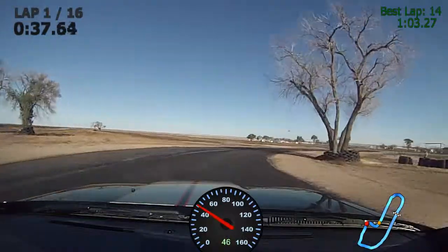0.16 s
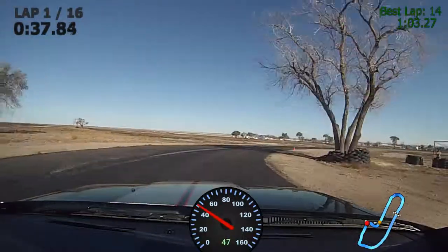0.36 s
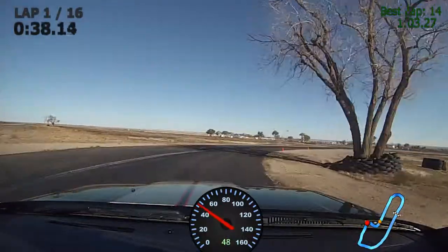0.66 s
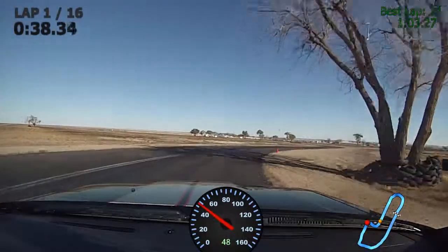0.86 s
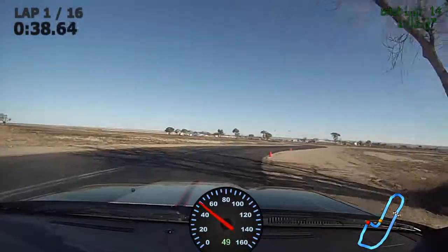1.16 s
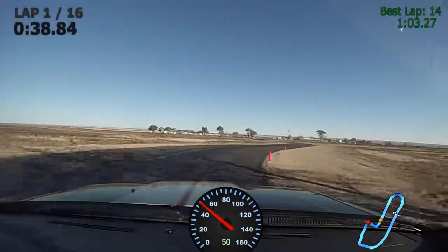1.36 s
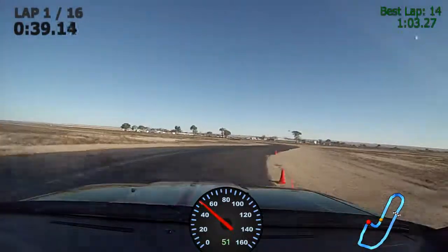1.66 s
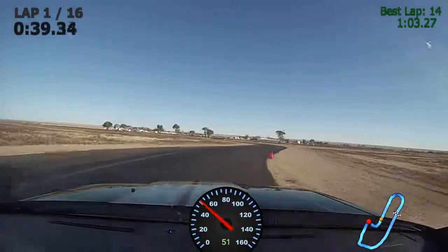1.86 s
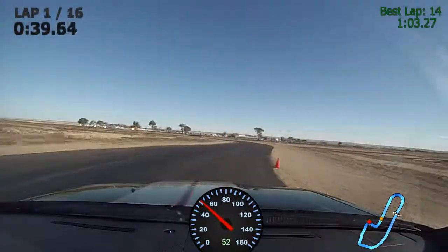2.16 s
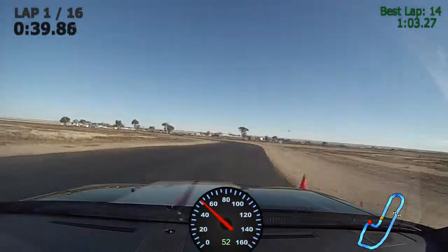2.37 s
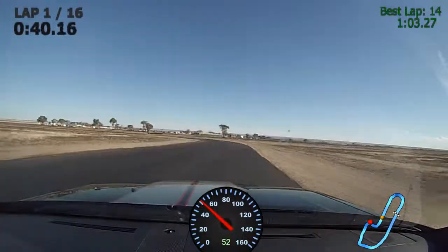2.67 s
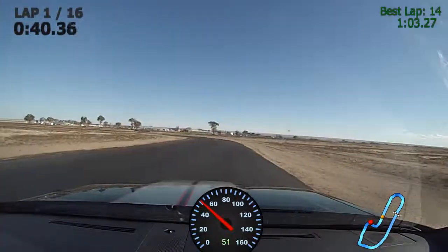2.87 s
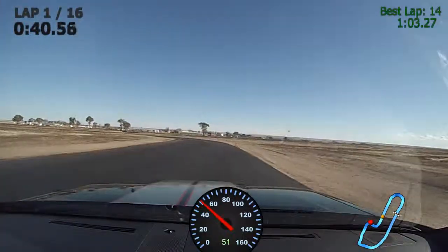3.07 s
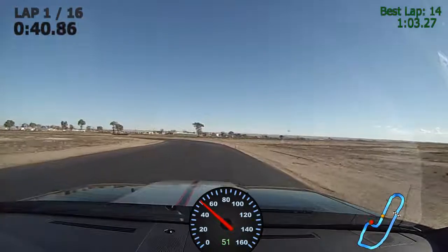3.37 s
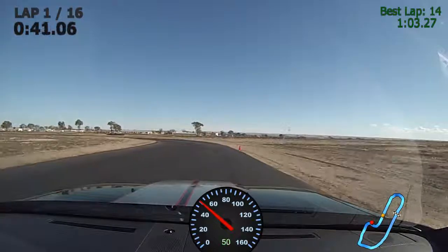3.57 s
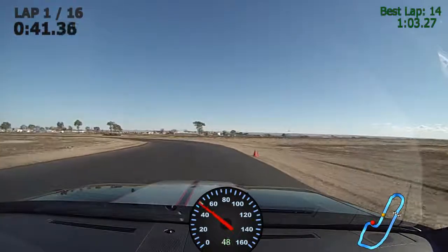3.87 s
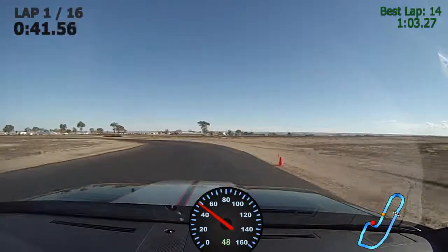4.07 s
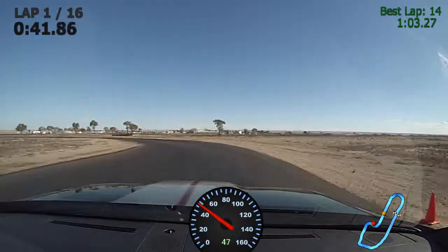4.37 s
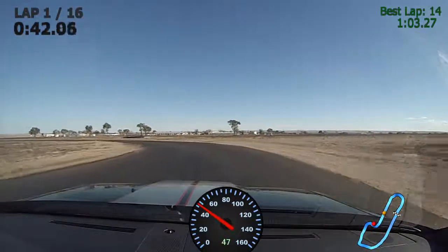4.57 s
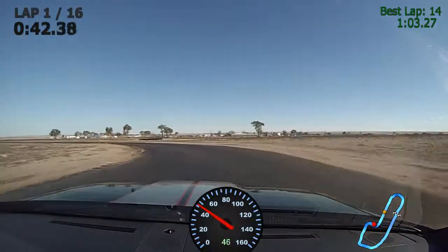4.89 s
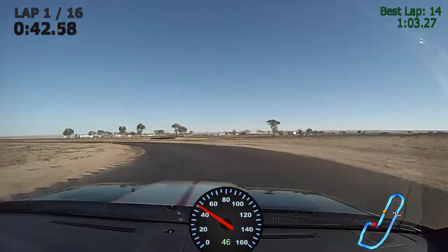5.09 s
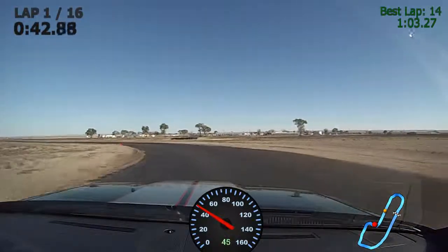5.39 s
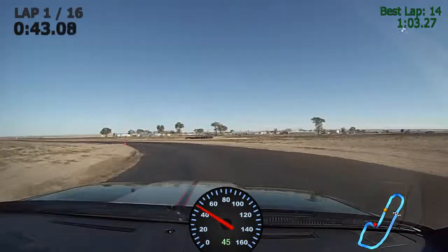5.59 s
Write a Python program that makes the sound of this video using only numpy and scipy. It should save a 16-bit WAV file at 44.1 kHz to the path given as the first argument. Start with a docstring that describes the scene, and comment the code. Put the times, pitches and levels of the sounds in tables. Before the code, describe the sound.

Inside a V8 track car, the engine pulls hard, tyres howl and squeal through a bend, then throttle lifts to a low growl.

```python
"""Inside a V8 track car in a long bend. The engine pulls from 3000 to 3500 rpm; a bump thumps the camera at 1.3 s.
The tyres howl and squeal from 1.6 to 2.5 s; at 3 s the engine lifts, shifts up and growls on at 2400 rpm.
At 5.3 s loose things clack and the tyres squeal again; a second bump follows. Wind and road noise run throughout.
Engine: sine orders plus pulse-excited pipe noise. Tyres, wind, road: shaped noise, squeals are tones.
Blows: damped modes and noise bursts. The camera's gain control ducks on peaks."""
import sys
import numpy as np
from scipy.fft import rfft, irfft, next_fast_len
from scipy.io import wavfile
from scipy.ndimage import uniform_filter1d, minimum_filter1d, map_coordinates

SR = 44100
rng = np.random.default_rng(int(sys.argv[2]) if len(sys.argv) > 2 else 0)


def generate_wav(sig):
    """Save sig (samples, or channels by samples) to the path in sys.argv[1] as 16-bit PCM at SR."""
    pcm = np.round(np.clip(np.atleast_2d(sig).T, -1, 1) * 32767).astype(np.int16)
    wavfile.write(sys.argv[1], SR, pcm)


N = 253134
T = np.arange(N) / SR
# the pipe booms less above this crank speed
BOOM_HZ = 50


def amp(db):
    """Decibels to gain."""
    return 10 ** (np.asarray(db) / 20)


def unit(x):
    """Scale to rms 1."""
    return x / np.sqrt(np.mean(x ** 2) + 1e-20)


def along(points, hz):
    """(Hz, value) points read on a log frequency axis."""
    f, v = np.transpose(points)
    return np.interp(np.log(hz + 1), np.log(f), v)


def curves(rows):
    """One value per sample for each column after the time."""
    s, *cols = np.transpose(rows)
    return [np.interp(T, s, c) for c in cols]


def wobble(rate_hz):
    """Smooth random curve, rate_hz knots a second."""
    return map_coordinates(rng.standard_normal(4096), [T * rate_hz], mode="mirror")


def swell(start_s, length_s):
    """Rounded burst envelope."""
    phase = np.clip((T - start_s) / length_s, 0, 1)
    return np.sqrt(np.abs(np.sin(np.pi * phase)))


def filtered(x, response):
    """x times a response of frequency."""
    m = next_fast_len(N + 8192)
    return irfft(rfft(x, m) * response(np.fft.rfftfreq(m, 1 / SR)), m)[:N]


def coloured(x, spectrum):
    """x shaped by a spectrum, at rms 1."""
    return unit(filtered(x, lambda hz: amp(along(spectrum, hz))))


def noise(spectrum):
    """Coloured noise of rms 1."""
    return coloured(rng.standard_normal(N), spectrum)


def order_tone(order, turns):
    """Sine of rms 1 locked to the crank, random phase."""
    return np.sqrt(2) * np.sin(2 * np.pi * (order * turns + rng.random()))


def engine(crank_hz, turns, shut):
    """Two low orders drone; unequal cylinders add half orders that sweep through the cabin's resonances."""
    # cabin response to the upper orders: f/Hz, level/dB
    cabin = [(50, -9), (80, 6), (115, 3), (170, 4.5), (200, 7), (265, -11.5), (322, -3), (335, -3.5),
             (349, 3), (392, -12), (422, 0.5), (465, -7), (503, 0.5), (530, -4.5), (570, -3), (660, -14.5),
             (820, -16.5), (1200, -34)]
    # single orders boom in the cabin, back on throttle at low revs: t/s, length/s, order, level/dB
    booms = [(4.205, 0.39, 4, -22), (4.628, 0.15, 3, -20.5)]
    # level at full throttle, drop with the throttle shut
    third_full_db, third_shut_db = -23, 15.5
    firing_full_db, firing_shut_db, firing_db_per_hz = -21, 22, 0.45
    upper_full_db, upper_shut_db = -33, 13
    # upper orders relative to the even ones
    odd_db, half_db = -2.5, -6.5

    third_db = third_full_db - third_shut_db * shut
    rev_loss_db = firing_db_per_hz * np.maximum(0, crank_hz - BOOM_HZ)
    firing_db = firing_full_db - firing_shut_db * shut - rev_loss_db
    upper_db = upper_full_db - upper_shut_db * shut

    out = np.zeros(N)
    for k, level_db in ((3, third_db), (4, firing_db)):
        boom = sum(amp(db) * swell(s, length) for s, length, order, db in booms if round(order) == k)
        level = np.maximum(amp(level_db), boom)
        out += level * amp(.9 * wobble(15)) * order_tone(k, turns)
    # orders 1.5 to 17 in halves
    for k in np.setdiff1d(np.arange(3, 35) / 2, [3, 4]):
        weaker_db = half_db if k % 1 else odd_db if k % 2 else 0
        level_db = upper_db + along(cabin, k * crank_hz) + weaker_db + 2.5 * wobble(16)
        out += amp(level_db) * order_tone(k, turns)
    return out


def burble(crank_hz, turns, shut):
    """Four firings a turn, each of random strength, boom in the pipe; most under load at low revs."""
    # pipe spectrum: f/Hz, level/(dB per Hz)
    pipe = [(30, -33), (60, 0), (80, 1), (97, -2.5), (120, 6), (150, -7.5), (210, -11.5), (280, -14),
            (600, -67)]
    full_db, shut_db, db_per_hz = -23.5, 11, 0.73
    firings = np.diff(np.floor(4 * turns), prepend=0)
    level_db = full_db - shut_db * shut - db_per_hz * (crank_hz - BOOM_HZ)
    return amp(level_db) * coloured(firings * rng.standard_normal(N), pipe)


def tyres():
    """Sliding tyres howl and scrub; when the tread breaks into stick-slip they squeal in short bursts."""
    # slides towards the limit and back to grip: peak t/s, build-up/s, recovery/s, slip/0-1
    slides = [(1.54, 0.62, .08, 0.64), (2.43, 0.25, .32, 0.86), (4.45, 0.18, 0.31, 0.35),
              (5.38, 0.63, 0.52, .3)]
    # howl spectrum: f/Hz, level/(dB per Hz)
    howl_spectrum = [(560, -22), (700, 3.5), (770, 0.5), (815, 8), (850, -2.5), (890, -9), (1050, -3),
                     (1250, -48.5)]
    # scrub spectrum: f/Hz, level/(dB per Hz)
    scrub_spectrum = [(1000, -15), (1450, -4), (1700, 1.5), (2000, 4.5), (2400, -4.5), (3000, -3.5),
                      (4000, -17), (9000, -41)]
    # stick-slip bursts: t/s, length/s, mean f/Hz, level/dB
    squeals = [(-.03, 0.09, 1014, -35), (1.568, 0.092, 728, -25.5), (1.741, 0.0857, 724, -25),
               (1.863, 0.09, 722, -22), (1.95, 0.091, 722, -21.5), (2.037, 0.11, 728, -25.5),
               (2.11, 0.061, 797, -26.5), (2.301, 0.038, 722, -19), (2.376, 0.066, 841.5, -21),
               (2.485, 0.046, 838, -21), (5.331, 0.11, 782, -27)]
    # level with full grip, rise at full slip
    howl_db, howl_slip_db = -36, 14
    scrub_db, scrub_slip_db = -64.5, 29

    slip = sum(peak * np.exp(-np.abs(T - s) / np.where(T < s, build, recover))
               for s, build, recover, peak in slides)
    out = amp(howl_db + howl_slip_db * slip) * noise(howl_spectrum)
    out += amp(scrub_db + scrub_slip_db * slip + 1.4 * wobble(90)) * noise(scrub_spectrum)
    # the slip rate wanders, which smears each tone
    slip_time_s = np.cumsum(1 + .006 * wobble(45) + .016 * wobble(260)) / SR
    chatter = unit(amp(2.6 * wobble(110)))
    for s, length, hz, db in squeals:
        tone = np.sqrt(2) * np.sin(2 * np.pi * hz * slip_time_s)
        out += amp(db) * swell(s, length) * chatter * tone
    return out


def ring(modes, t, attack_s):
    """Damped modes after a blow; neighbouring modes swing in opposite directions."""
    swing = np.zeros(len(t))
    for k, (hz, db, t60) in enumerate(modes):
        swing += (-1) ** (k + 1) * amp(db - 60 * t / t60) * np.sin(2 * np.pi * hz * t)
    return swing * (1 - np.exp(-t / attack_s))


def blows():
    """Bumps ring the camera's mount and make it chafe; knocks ring the trim with a short crack."""
    # bumps through the body: t/s, thump/dB, chafe/dB
    bumps = [(1.2844, 6.5, -42), (5.4427, 7, -41)]
    # camera mount modes: f/Hz, level/dB, t60/s
    mount = [(52.5, -1.5, 0.25), (149.4, 3.5, 0.083), (206, -13, 0.046), (257, -12.5, 0.066),
             (530, -30, .04)]
    # knocks in the cabin, the one at 1.284 s part of the first bump: t/s, knock/dB, crack/dB
    knocks = [(1.214, -8, -48), (1.284, -22, -31), (1.671, -24, -39), (1.715, -35, -40), (3.474, -6.5, -58),
              (3.925, -7, -43), (5.261, -4.5, -20), (5.2667, -4, -26)]
    # trim panel modes: f/Hz, level/dB, t60/s
    trim = [(188, -10, 0.058), (356, -9.5, 0.036), (593, -14.5, 0.081), (793, -6.5, 0.032),
            (960, -13, 0.0041)]
    # crack and chafe spectrum: f/Hz, level/(dB per Hz)
    crack_spectrum = [(100, -27), (900, -12), (1700, -8), (2300, 2.5), (2700, 7), (3300, 6.5), (4200, -1),
                      (6500, -4), (9000, -12), (12000, -19), (15700, -19)]
    rattle_knock_db, rattle_crack_db, rattle_spread_db = -17.5, -49, 3

    out, t = np.zeros(N + SR), np.arange(SR // 2) / SR
    crack = noise(crack_spectrum)

    def burst():
        """Random stretch of the crack noise."""
        return np.roll(crack, rng.integers(N))[:len(t)]

    def add(s, blow):
        """Place a blow at s seconds."""
        out[round(s * SR):][:len(t)] += blow

    snap = amp(-60 * t / 0.048) * (1 - np.exp(-t / 0.0019))
    chafing = np.interp(t, [0, .003, .032, .055], [0.079, 0.96, 0.72, 0])
    for s, thump_db, chafe_db in bumps:
        thump = amp(thump_db) * ring(mount, t, attack_s=0.0057)
        add(s, thump + amp(chafe_db) * chafing * burst())
    # eight lighter rattles at random moments
    rattles = [(u * T[-1], rattle_knock_db + rattle_spread_db * z, rattle_crack_db + rattle_spread_db * z)
               for u, z in zip(rng.random(size=8), rng.standard_normal(size=8))]
    for s, knock_db, crack_db in list(knocks) + rattles:
        knock = amp(knock_db) * ring(trim, t, attack_s=0.00054)
        add(s, knock + amp(crack_db) * snap * burst())
    return out[:N]


def wind_and_road(throttle):
    """Air buffets the cabin, the tread roars on coarse asphalt, the windows hiss; all grow with speed."""
    # car over the ground: t/s, speed/(m/s)
    speed = [(0, 20.2), (2.5, 21.8), (3.1, 23.2), (4, 22.4), (5.74, 19.7)]
    # gusts: peak t/s, half width/s, rise/dB
    gusts = [(.4, 0.13, 2.5), (2.5, 0.065, 2.5), (3.0, 0.18, 3.5), (4.42, 0.15, 2), (5.04, 0.067, 6.5)]
    # buffet spectrum: f/Hz, level/(dB per Hz)
    buffet_spectrum = [(6, -43), (14, -44), (21, -8), (28, 3), (42, -1.5), (55, -9.5), (75, -18.5),
                       (120, -22.5), (220, -23.5), (500, -92.5)]
    # road spectrum: f/Hz, level/(dB per Hz)
    road_spectrum = [(15, -43), (60, 2.5), (120, 3), (200, 4), (270, 0.5), (360, 0), (450, -2), (560, 3),
                     (670, 0.5), (820, -3), (920, -6), (1050, -9.5), (1250, -23.5), (1800, -59)]
    # air spectrum: f/Hz, level/(dB per Hz)
    air_spectrum = [(100, -27), (1300, 7.5), (1700, 0), (2200, 2), (2900, 0.5), (3600, -7.5), (4500, -10.5),
                    (6200, -16), (8300, -19.5), (9300, -28), (12000, -39), (15700, -38)]
    # levels at cruise speed, growth for a tenfold speed
    cruise_m_s = 21.5
    buffet_db, road_db, air_db = -17, -28, -45.5
    buffet_speed_db, road_speed_db, air_speed_db = 11, 2, 60
    throttle_roar_db = 3  # extra engine roar mixed into the road noise at full throttle

    pace = np.log10(curves(speed)[0] / cruise_m_s)
    gust_db = sum(db * np.exp(-((T - s) / width) ** 2) for s, width, db in gusts)
    lumps = noise(buffet_spectrum)
    # keep the buffeting's strength roughly even, in swells and lulls alike
    power = np.abs(uniform_filter1d(lumps ** 2, size=SR // 6))
    lumps = unit(lumps / np.sqrt(power + .05))
    buffet = amp(buffet_db + buffet_speed_db * pace + gust_db) * lumps
    roar_db = road_db + road_speed_db * pace + throttle_roar_db * throttle + 0.28 * wobble(25)
    roar = amp(roar_db) * noise(road_spectrum)
    hiss = amp(air_db + air_speed_db * pace + 0.77 * wobble(40)) * noise(air_spectrum)
    return buffet + roar + hiss


def scene():
    """Everything as it reaches the camera behind the windscreen."""
    # crankshaft: t/s, turns per second/Hz
    crank = [(0, 50), (.45, 51.75), (1.15, 53.29), (2.15, 57.11), (2.95, 58.56), (3.22, 58.28),
             (4.22, 40.44), (4.6, 39.59), (5.74, 39.28)]
    # driver's foot: t/s, throttle/0-1
    foot = [(0, 0.97), (2.55, 1), (2.95, 0.83), (3.4, 0.19), (4.2, 0.12), (4.27, 0.45), (4.85, 0.57),
            (5.15, 0.31), (5.74, 0.18)]
    crank_hz = curves(crank)[0] * (1 + .002 * wobble(12))
    turns = np.cumsum(crank_hz) / SR
    throttle = np.clip(curves(foot)[0], 0, 1)
    shut = 1 - throttle
    exhaust = engine(crank_hz, turns, shut) + burble(crank_hz, turns, shut)
    return (exhaust + wind_and_road(throttle) + tyres() + blows())[None]


def gain_control(x, ceiling, hold_s, recovery_db_per_s):
    """Peaks over the ceiling pull the gain down; it holds, then climbs at a steady dB rate."""
    need_db = 20 * np.log10(np.minimum(1, ceiling / (np.abs(x) + 1e-9)))
    half = int(hold_s * SR / 2)
    held_db = minimum_filter1d(need_db, 2 * half + 1, origin=half)
    climb_db = recovery_db_per_s * T
    cut_db = np.minimum.accumulate(held_db - climb_db) + climb_db
    return x * amp(uniform_filter1d(minimum_filter1d(cut_db, size=128), size=128))


def record(dry):
    """The camera ducks on peaks; a ripple in its sample timing mirrors loud tones faintly into the treble."""
    clock_hz, top_hz = 3900, 15720
    x = gain_control(dry[0], ceiling=.96, hold_s=0.12, recovery_db_per_s=18)
    ripple = sum(np.sin(2 * np.pi * k * clock_hz * T) / k ** 0.98 for k in range(1, 5))
    # a small timing shift adds shift times slope
    x = x + 0.28 * ripple * np.gradient(x)
    return filtered(x, lambda hz: hz < top_hz)[None]


dry = scene()
out = record(dry)
generate_wav(out)
```